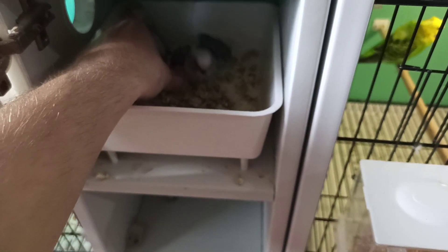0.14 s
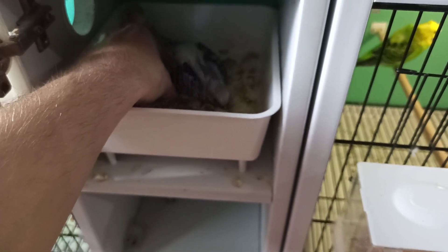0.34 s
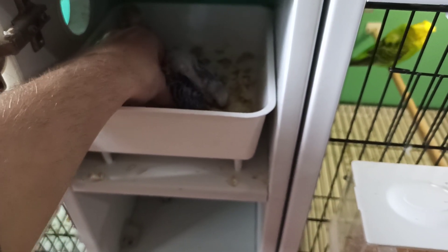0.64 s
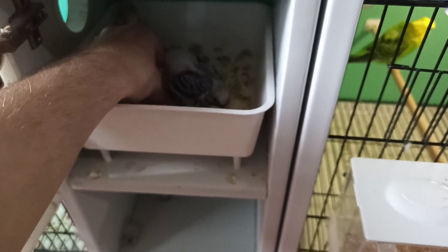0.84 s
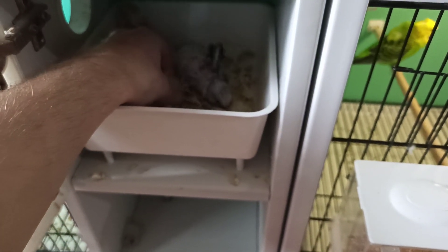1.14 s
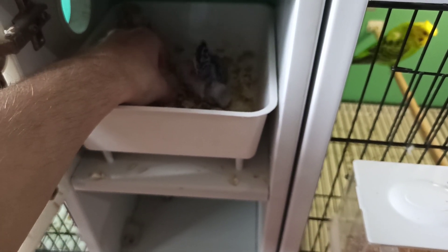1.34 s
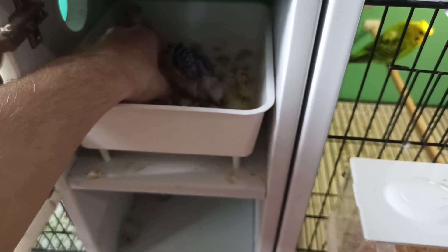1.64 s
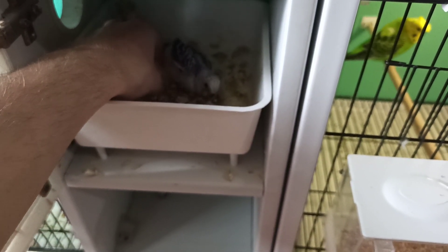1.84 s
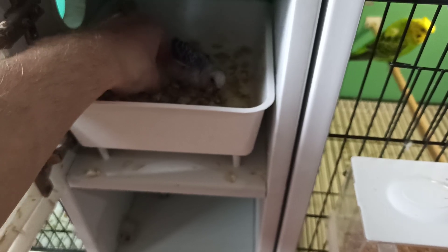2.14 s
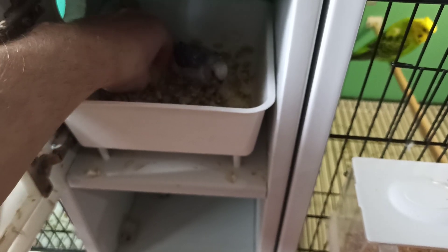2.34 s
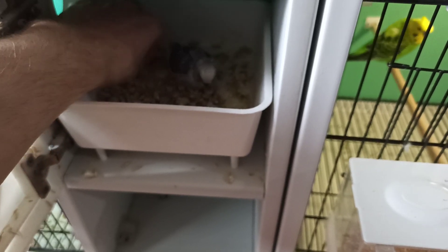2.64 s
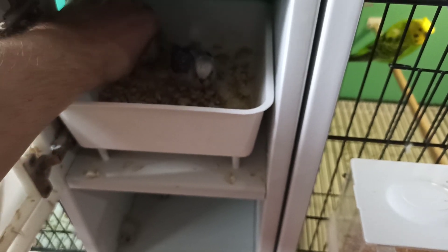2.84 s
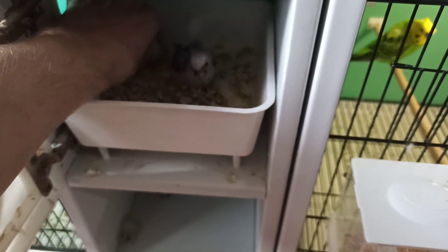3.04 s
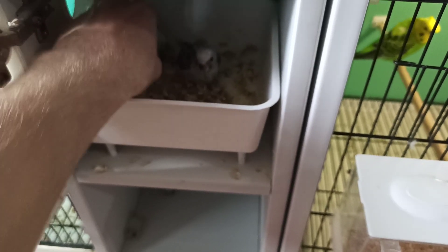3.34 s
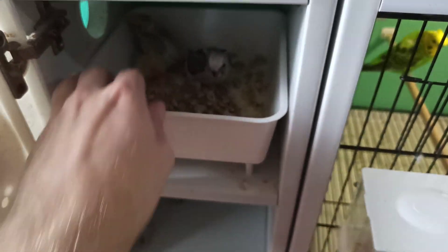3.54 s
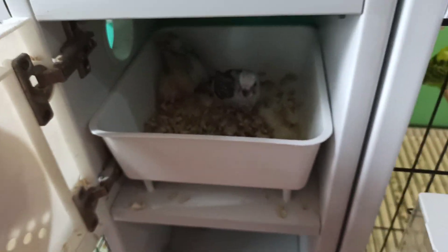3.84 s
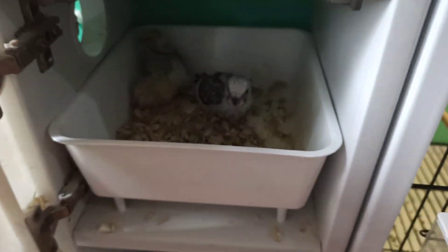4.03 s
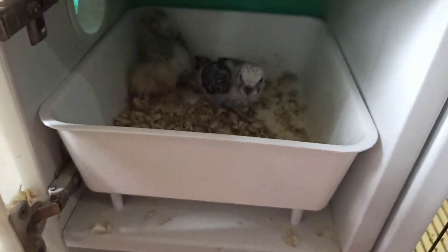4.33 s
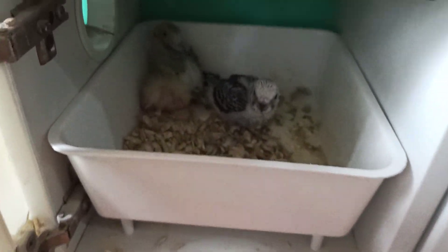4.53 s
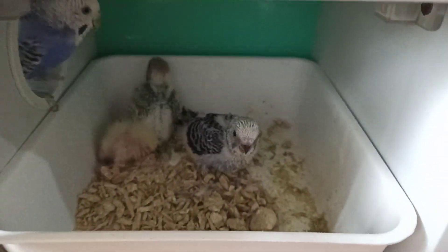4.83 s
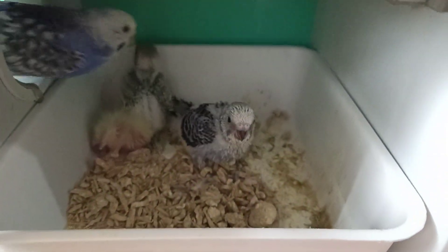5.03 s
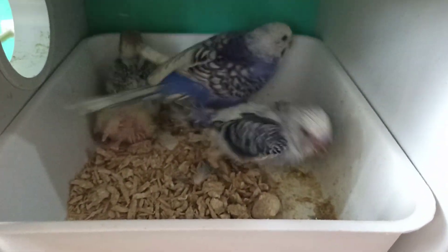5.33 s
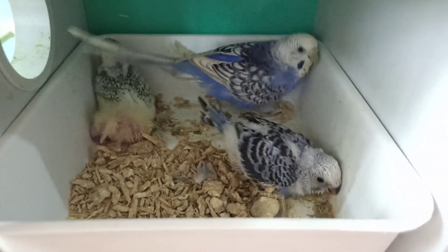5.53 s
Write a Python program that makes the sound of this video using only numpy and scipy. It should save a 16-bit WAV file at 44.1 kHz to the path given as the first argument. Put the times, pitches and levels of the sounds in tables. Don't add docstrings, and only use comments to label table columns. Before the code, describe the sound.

In a lively aviary, a chick's quick squeaky trills mix with whistles, swooping calls, harsh squawks, bedding rustle and knocks on a plastic tray.

```python
import sys
import numpy as np
from scipy import signal
from scipy.fft import rfft, irfft, next_fast_len
from scipy.io import wavfile
from scipy.ndimage import uniform_filter1d

SR = 44100
rng = np.random.default_rng(int(sys.argv[2]) if len(sys.argv) > 2 else 0)


def how_loud(loudness_db):
    steps = np.asarray(loudness_db, float) / 20
    return 10 ** steps


def generate_wav(sig):
    pcm = np.round(np.clip(np.atleast_2d(sig).T, -1, 1) * 32767).astype(np.int16)
    wavfile.write(sys.argv[1], SR, pcm)


N = 250440

# top time in seconds,
# dip before it in Hz, ledge in Hz, top in Hz, level in dB.
TRILL_NOTES = [
    [(0.004, 3500, 3640, 4625, -36.5), (0.062, 3200, 3537, 4650, -35.5)],
    [(0.312, 3160, 3574, 4420, -41.5), (0.371, 3160, 3600, 4620, -40), (0.43, 3316, 3630, 4080, -38.5)],
    [(.588, 3350, 3600, 4340, -43), (.646, 3400, 3720, 4750, -39.5), (.704, 3300, 3590, 4420, -47),
     (0.763, 3250, 3480, 4100, -35.5)],
    [(1.705, 3330, 3620, 4780, -37.5), (1.765, 3260, 3640, 4620, -35.5), (1.816, 3195, 3470, 4000, -41)],
    [(2.038, 3142, 3475, 4620, -36.5), (2.096, 3270, 3620, 4630, -34), (2.157, 3260, 3620, 4054, -36.5)],
    [(2.982, 2450, 3670, 4670, -45.5), (3.035, 3150, 3720, 4780, -42)],
    [(3.26, 3300, 3697, 4680, -38.5), (3.318, 3373, 3670, 4600, -38), (3.375, 3435, 3680, 4420, -37.5)],
    [(3.764, 3200, 3666, 4510, -38), (3.818, 3214, 3600, 4250, -36.5)],
    [(4.178, 3520, 3500, 4700, -41), (4.235, 3150, 3760, 4480, -41)],
    [(4.9, 3400, 3500, 4440, -36.5), (4.957, 3050, 3406, 4050, -38.5), (5.017, 3150, 3350, 3950, -36.5),
     (5.077, 2876, 3300, 3850, -38.5)],
]
# start in seconds from the scene start,
# last dip in Hz, last dip in dB, 2nd partial in dB.
TRILL_ENDINGS = [(-.052, 3250, -7, -1.5), (.262, 3300, -6, -2.5), (.548, 3430, -5, -13),
                 (1.655, 2930, -18, -1), (1.983, 3125, 1.5, -4), (2.923, 3600, -24, -1),
                 (3.209, 3174, 9.5, -5), (3.726, 3150, -4, -9.5), (4.134, 3280, -5, -12.5),
                 (4.868, 3080, -16, -13)]
# 3rd partial in dB, left over right in dB, room send in dB.
TRILL_TONE = (-30, -4.3, -8)
LEAD_S = 0.008
DROP_S, FLICK_S, PERCH_S, TAIL_S = 0.013, 0.0035, 0.0035, 0.0089
REST_SHARE, LEDGE_SHARE = 0.34, 0.6
HIGH_TOP_HZ = 4300
LEAP_DB, TOP_DB, DIP_DB = 1, 0, -0.5
# frequency in Hz, gain in dB.
PARTIAL_GAIN = [(4750, -0.5), (5150, -12), (5900, -1), (6300, -0.5), (7500, 3.5), (7950, -12),
                (15700, -18.5), (16300, -90)]

# top time in seconds, low pitch in Hz, top pitch in Hz, level in dB.
PEEP_NOTES = [
    (2.917, 2600, 3300, -50),
    (2.992, 2550, 3300, -51),
    (4.141, 2600, 3600, -44),
    (4.206, 2400, 3520, -39.5),
    (4.282, 2350, 3550, -45),
    (4.358, 2430, 3600, -50.5),
    (4.876, 2600, 3650, -49),
    (4.941, 2450, 3600, -50),
    (5.011, 2400, 3700, -46),
    (5.08, 2300, 3700, -49.5),
]
# seconds from the top, share of the height, level in dB.
PEEP_CURVE = [(-.028, -.05, -3), (-.011, .08, 2), (-.007, 0.57, -1), (-.003, 1, 6), (.005, 0.85, -2.5),
              (.009, .55, -9), (.013, .05, 4), (0.021, 0, -8)]

# start in seconds, length in seconds,
# start in Hz, end in Hz, level in dB.
HELD_WHISTLES = [
    (0.836, 0.18, 3116, 3050, -20.5),
    (1.241, 0.23, 3093, 3097, -21),
    (3.533, 0.14, 3440, 3275, -33),
    (0.518, 0.053, 3386, 3326, -38),
    (0.55, 0.079, 1920, 1850, -44.5),
    (2.286, 0.12, 1620, 1762, -49),
    (3.313, 0.12, 2080, 1880, -42),
    (3.536, 0.19, 6660, 6820, -44),
]
PIPED_NOTES = [
    (0.771, 0.043, 2697, 2673, -22.5),
    (1.17, 0.091, 2700, 2765, -23.5),
]
HELD_OVERTONES = [-34, -17, -18]
PIPED_OVERTONES = [-12.5, -3.5, 4, -7.5]

# time in seconds, pitch in Hz, level in dB.
SWOOP_CURVES = [
    [(.985, 1653, -46), (1.04, 1790, -38.5), (1.075, 1920, -33), (1.095, 2130, -29.5), (1.12, 2480, -25.5),
     (1.14, 2620, -28.5), (1.17, 2353, -32.5), (1.205, 2225, -28.5), (1.23, 1920, -35)],
    [(3.532, 1620, -44), (3.61, 1682, -40), (3.635, 1875, -28), (3.655, 2097, -22.5), (3.68, 2394, -28.5),
     (3.705, 2394, -24.5), (3.73, 2237, -21), (3.8, 2177, -22.5), (3.83, 1924, -35), (3.88, 1980, -42.5)],
]
# 2nd to 7th partial in dB, then room send in dB.
SWOOP_TONE = (-14, -22, -38, -30, -29, -20, -1.5)
SWOOP_WAVER = (0.028, 0.022)

# time in seconds, pitch in Hz, level in dB.
BEND_CURVES = [
    [(.59, 2840, -28.5), (.605, 2760, -36.5), (.63, 2464, -27.5), (.665, 2507, -41.5), (.7, 2333, -47.5),
     (.745, 2466, -47)],
    [(.565, 3625, -35.5), (.59, 3890, -39.5), (.625, 3770, -41), (.66, 3650, -59.5)],
    [(.99, 3415, -19.5), (1.01, 3536, -20), (1.045, 3270, -26.5), (1.058, 3553, -19.5), (1.1, 3530, -34),
     (1.16, 3590, -44)],
    [(1.16, 2660, -27.5), (1.205, 2770, -36), (1.225, 2600, -17.5), (1.25, 2994, -31.5)],
    [(2.34, 3900, -43), (2.365, 3790, -43.5), (2.39, 3620, -41.5), (2.425, 3463, -27.5), (2.45, 3304, -38),
     (2.49, 3290, -46)],
    [(2.405, 3000, -40), (2.43, 2770, -27), (2.46, 2733, -27), (2.5, 2710, -48)],
]
BEND_WAVER = (.05, 0.055, 0.032, 0.075, 0.037, 0.023)
BEND_SECOND_DB = (-15, -12, -18, -21.5, -24, -20)
# 3rd, 4th and 5th partial in dB, then room send in dB.
BEND_TONE = (-12.5, -10.5, -12, -1)

# start in seconds, start in Hz, end in Hz, level in dB.
CHIP_NOTES = [(0.113, 3620, 3440, -38), (0.137, 7270, 6350, -44), (0.171, 6900, 2940, -53),
              (0.524, 8300, 4140, -48), (1.787, 2050, 2160, -46), (2.035, 1580, 1500, -46.5),
              (0.782, 3280, 3340, -35), (0.977, 6530, 4400, -34.5), (2.245, 6800, 4380, -50),
              (3.155, 4960, 3530, -50), (4.115, 2650, 2800, -51), (4.251, 1600, 1700, -44.5),
              (3.527, 5000, 3510, -35.5), (3.934, 6770, 4800, -29), (3.948, 5212, 6630, -33),
              (3.977, 6700, 3100, -42), (4.093, 2250, 2370, -40.5), (0.525, 6650, 6580, -34.5),
              (0.799, 4700, 3390, -35), (4.418, 6350, 6500, -30), (4.822, 6900, 4560, -28.5),
              (4.838, 4600, 2950, -41), (5.208, 6390, 6500, -28), (5.24, 7231, 3700, -44),
              (5.586, 3340, 3960, -36.5), (5.611, 2900, 2970, -36.5), (5.62, 6890, 6390, -29),
              (5.631, 6677, 3670, -38), (5.638, 8570, 7000, -59), (5.653, 3770, 3280, -39)]
CHIP_S, CHIP_S_PER_OCTAVE = 0.013, 0.006
# start pitch in Hz, left over right in dB.
CHIP_SIDE = [(2500, -3), (7000, 9.5)]

# start in seconds, length in seconds, level in dB.
COO_NOTES = [
    (2.2, 0.0514, -50),
    (2.3, 0.2, -62.5),
    (2.35, 0.0454, -49),
    (2.51, 0.07, -55),
    (4.14, 0.034, -50.5),
    (4.2, 0.063, -54),
    (4.33, .12, -59.5),
    (4.5, 0.06, -56.5),
    (4.59, 0.10376, -58.5),
]
COO_HZ = 497.2

# start in seconds, rise in seconds, time to fall 60 dB in seconds,
# effort in dB, share of low sound in dB.
FAR_BIRD = [
    (.518, 0.029, 0.17, -41, -3.5),
    (0.58, 0.068, 0.36, -38.5, -2.5),
    (.775, 0.055, 0.22, -31.5, 6.5),
    (.965, 0.056, 0.4, -32.5, 5),
    (1.19, 0.045, 0.37, -30.5, 4.5),
    (1.376, 0.037, 0.11, -45, 6.5),
]
NEAR_BIRD = [
    (2.499, 0.045, 0.21, -21, -4),
    (2.645, 0.019, 0.24, -19, -9.5),
    (4.42, 0.046, 0.235, -20, -8),
    (4.53, 0.06, 0.21, -18, -11),
    (4.718, 0.025, 0.041, -21.5, -7.5),
    (5.274, 0.032, 0.1, -19.5, -6),
    (5.362, 0.067, 0.17, -20.5, -7),
    (5.491, 0.017, 0.18, -36, -15),
]
FAR_PAN_DB, NEAR_PAN_DB = -8, -8.5
FAR_START, NEAR_START = 0.05, 0.17
# frequency in Hz, width in Hz, level in dB.
BEAK_RINGS = [(3620, 60, 9), (4565, 56, 12.5), (5600, 19, -31.5), (6500, 160, 17), (7050, 60, -2),
              (7482, 14, 20)]
BEAK_WANDER, BEAK_WANDER_S = 0.012, 0.0089
# frequency in Hz, level in dB per Hz.
RASP_TONE = [(530, -100.5), (900, -27), (1030, -35.5), (2080, -14), (3600, 0.5), (5040, -13.5),
             (6560, -2.5), (7840, -16), (8630, -25), (8950, -45), (9500, -64), (11100, -57.5), (11500, -13),
             (12100, -26.5), (15700, -30)]

# time in seconds, peak in dB, pitch in Hz, time to fall 60 dB in seconds.
BOX_KNOCKS = [(0.2, -31, 352, 0.073), (0.657, -26, 292, 0.094), (1.27, -36.5, 302, 0.11),
              (1.699, -49, 300, 0.11), (1.762, -48, 297, 0.084), (2.643, -37, 566, 0.057),
              (3.104, -35, 274, 0.045), (3.256, -37, 275.8, 0.17), (3.483, -33.5, 284, 0.066),
              (3.553, -39.5, 147, 0.1), (3.644, -30.5, 700, 0.031), (4.137, -34.5, 356, 0.051),
              (4.27, -43.5, 268, 0.34), (4.791, -43.5, 235.1, 0.25), (4.874, -27.5, 330, 0.023),
              (5.135, -36.5, 317, 0.083), (5.183, -42.5, 1320, 0.13), (5.211, -13.5, 300, 0.038),
              (5.231, -17, 291, 0.047), (5.25, -18, 235, 0.038), (5.275, -26.5, 244, 0.12),
              (5.294, -18.5, 1187, 0.025), (5.376, -33, 313, 0.14), (5.444, -11, 328.6, 0.021),
              (5.561, -21, 1150, 0.022)]
# time in seconds, peak in dB, left over right in dB.
SHAVING_SNAPS = [(0.2013, -59.5, 11), (2.0666, -35.5, -10.5), (2.254, -50, -8.5), (2.393, -37, 2),
                 (2.8538, -33, -7.5), (3.0937, -45, -1.5), (3.4868, -39.5, 7), (3.53, -42, -1),
                 (3.93, -38.5, -5.5), (4.1745, -32.5, -2), (4.226, -33.5, -13.5), (4.274, -32.5, -3),
                 (4.8745, -35, -1), (4.921, -62, -4), (5.1362, -41, 18.5), (5.153, -31.5, 7.5),
                 (5.195, -36, -1.5), (5.213, -36, 16)]
# start in seconds, length in seconds, level in dB, centre in Hz.
SHAVING_RUSTLES = [
    (0.032, 0.15, -40, 2530),
    (0.333, 0.043, -54.5, 2230),
    (1.981, 0.14, -50.5, 1620),
    (2.142, 0.11, -45, 1420),
    (2.555, 0.035, -47, 1230),
    (3.356, 0.1, -35, 2438),
    (3.4, 0.12, -45, 910),
    (4.95, 0.086, -66, 2505),
    (5.191, 0.087, -35.5, 960),
]

# time in seconds, chatter in dB.
FLOCK_STIR = [(0, -42.5), (0.219, -53.5), (.45, -53), (.7, -45.5), (1.3, -48.5), (1.6, -49.5), (1.92, -56),
              (2.2, -48), (2.7, -45.5), (2.951, -51.5), (3.15, -54.5), (3.699, -47.5), (4.049, -57.5),
              (4.349, -53), (4.85, -47), (5.099, -57), (5.3, -38), (5.68, -45)]
# frequency in Hz, level in dB per Hz.
CHATTER_TONE = [(710, -54.5), (1200, -3.5), (1320, -6), (1620, 0), (1950, -5.5), (2340, 3), (4230, 2),
                (4710, -3), (5900, -9), (6570, 4.5), (8140, 1), (8500, -14.5), (9000, -55.5),
                (11300, -56.5), (11700, -14), (15700, -13)]
# frequency in Hz, level in dB per Hz.
RUMBLE_TONE = [(18, -41.5), (30, -37), (43, -53.5), (92, 1), (200, -2.5), (295, 1), (697, -9), (923, -6.5),
               (1290, -16.5), (1510, -26.5), (2000, -11), (2600, -53), (4400, -120)]
RUMBLE_DB, RUMBLE_SHARE, CALM_DB = -51, 0.44, -47
RUMBLE_RISE_DB = 0.8644
# frequency in Hz, level in dB.
FAN_TONES = [(99, -61.5), (302, -63)]

# frequency in Hz, likeness from -1 to 1.
PORT_LIKENESS = [(60, 0.03), (180, 0.97), (550, 0.54), (1650, -0.37), (4970, 0.067), (15000, -0.092)]
# frequency in Hz, left over right in dB.
PORT_LEAN = [(60, 1.5), (180, 0.5), (550, 2), (1650, -0.57), (4970, -2), (15000, -2)]
# frequency in Hz, time to fall 60 dB in seconds.
ROOM_DECAY = [(1500, 0.31), (3960, 0.33), (10400, 0.18)]
# first in seconds, last in seconds, level in dB.
TRAY_ECHOES = (.0006, .005, -11.5)
LEFT_LEAD = 10
DROPPED_BAND = (8620, 11620)


def trill(stage, notes, ending):
    start, last_hz, last_db, second_db = ending
    rows = [(start - LEAD_S, 1.1 * notes[0][1], notes[0][4] - 6)]
    for s, dip, ledge, top, db in notes:
        flick = FLICK_S * (1 if top > HIGH_TOP_HZ else 2)
        middle = (ledge + top) / 2
        leap_level_db = db + LEAP_DB * (top - ledge) / 1000
        leap = s - PERCH_S - flick
        climb = leap - start
        land = s + PERCH_S + flick
        rows += [(start, dip, db + DIP_DB), (start + REST_SHARE * climb, dip, db + DIP_DB)]
        rows += [(start + LEDGE_SHARE * climb, ledge, db), (leap, ledge, db)]
        rows += [(leap + flick / 2, middle, leap_level_db)]
        rows += [(s - PERCH_S, top, db + TOP_DB), (s + PERCH_S, top, db + TOP_DB)]
        rows += [(s + PERCH_S + flick / 2, middle, leap_level_db), (land, ledge, db)]
        start = land + DROP_S / 2
    end = start + DROP_S / 2
    rows += [(end, last_hz, db + last_db), (end + TAIL_S, 0.97 * last_hz, db + last_db - 6.5)]
    begin = rows[0][0]
    cut = max(round(-begin * SR), 0)
    hz, db = (curve[cut:] for curve in spread(rows))
    third_db, pan_db, room_db = TRILL_TONE
    voice = syrinx(uniform_filter1d(hz, 50), db, [second_db, third_db], 0.009, 0.006)
    add(stage, begin, voice, pan_db, room_db)
    second = syrinx(0.64 * uniform_filter1d(hz, 300), db - 28, [], 0.027, 0.01)
    add(stage, begin + 0.013, second, pan_db, room_db)


def syrinx(hz, db, overtones_db, wobble, fade_s, flutter_db=3.0):
    turns = np.cumsum(hz * (1 + wobble * drift(len(hz), 0.002))) / SR
    tone = 0
    for number, gain_db in enumerate((0, *overtones_db), start=1):
        tone = tone + how_loud(gain_db + read(PARTIAL_GAIN, number * hz)) * np.sin(2 * np.pi * number * turns)
    fade = signal.windows.tukey(len(hz), min(2 * fade_s * SR / len(hz), 1))
    return np.sqrt(2) * tone * how_loud(db + flutter_db * drift(len(hz), 0.004)) * fade


def peeps(stage):
    for s, low_hz, top_hz, db in PEEP_NOTES:
        height, shape_db = spread(PEEP_CURVE)
        hz = low_hz + height * (top_hz - low_hz)
        add(stage, s + PEEP_CURVE[0][0], syrinx(hz, db + 2.5 + shape_db, [-20], 0.0057, 0.003), -3, -16)


def whistle(stage, row, overtones_db, wobble, room_db, swell=0.015, hold_share=0.46, fade_db=170):
    s, length, start_hz, end_hz, db = row
    t = np.arange(0, length, 1 / SR)
    swell_db = 8 * np.maximum(1 - t / swell, 0)
    tired_db = fade_db * np.maximum(t - hold_share * length, 0)
    hz = np.geomspace(start_hz, end_hz, len(t))
    add(stage, s, syrinx(hz, db - swell_db - tired_db, overtones_db, wobble, 0.0036), -3.5, room_db)


def whistles(stage):
    for row in HELD_WHISTLES:
        whistle(stage, row, HELD_OVERTONES, 0.004, -7)
    for row in PIPED_NOTES:
        whistle(stage, row, PIPED_OVERTONES, 0.012, -6)


def swoops(stage):
    *overtones_db, room_db = SWOOP_TONE
    for rows, wobble in zip(SWOOP_CURVES, SWOOP_WAVER):
        voice = syrinx(*spread(rows), overtones_db, wobble, 0.00073, flutter_db=4.0)
        add(stage, rows[0][0], voice, -3.5, room_db)


def bends(stage):
    *overtones_db, room_db = BEND_TONE
    for rows, wobble, second_db in zip(BEND_CURVES, BEND_WAVER, BEND_SECOND_DB):
        voice = syrinx(*spread(rows), [second_db, *overtones_db], wobble, 0.0026, flutter_db=3.5)
        add(stage, rows[0][0], voice, -3.5, room_db)


def chips(stage):
    for s, start_hz, end_hz, db in CHIP_NOTES:
        octaves = abs(np.log2(end_hz / start_hz))
        hz = np.geomspace(start_hz, end_hz, round((CHIP_S + CHIP_S_PER_OCTAVE * octaves) * SR))
        add(stage, s, syrinx(hz, db, [-25], 0.006, 0.003), read(CHIP_SIDE, start_hz), -12)


def squawk(stage, row, pan_db, first, pulses_hz=380, uneven=0.35, gate=0.19, ring_db=-5, room_db=2.5):
    s, rise, t60, db, low_db = row
    t = np.arange(-rise, t60, 1 / SR)
    size = len(t)
    turns = np.cumsum(pulses_hz * np.exp(uneven * drift(size, 0.00402))) / SR
    puffs = (gate + np.sin(np.pi * turns) ** 2) * how_loud(1.46 * drift(size, 0.0032)) * white(size)
    rasp = colour(puffs, lambda hz: read(RASP_TONE, hz))
    rings = 0
    for hz, width, gain_db in BEAK_RINGS:
        moving_hz = hz * (1 + BEAK_WANDER * drift(size, BEAK_WANDER_S))
        rings = rings + how_loud(gain_db) * evened(resonate(puffs, moving_hz, 3 * width))
    voice = evened(rasp) + how_loud(ring_db) * evened(rings)
    low = colour(voice, lambda hz: np.interp(hz, [4700, 5100], [0, -80]))
    rising = first + (1 - first) * np.cos(np.pi / 2 * t / rise) ** 2
    effort = np.where(t < 0, rising, how_loud(-60 * t / t60))
    add(stage, s, how_loud(db) * effort * (evened(voice - low) + how_loud(low_db) * evened(low)), pan_db, room_db)


def coos(stage):
    for s, length, db in COO_NOTES:
        hz = np.full(round(length * SR), COO_HZ)
        add(stage, s, syrinx(hz, db + 8.5, [-25], 0.0019, 0.014), 1.5, -12)


def knocks():
    out, t = np.zeros((3, N)), np.arange(6000) / SR
    for s, db, hz, t60 in BOX_KNOCKS:
        thud = np.sin(2 * np.pi * hz * t)
        thud += 0.32 * np.sin(2 * np.pi * 2.07 * hz * t) * how_loud(-60 * t / 0.2)
        thud *= how_loud(-60 * t / max(t60, 0.01))
        crackle = resonate(rng.standard_normal(len(t)), 1300, 2100) * how_loud(-13 - 60 * t / 0.053)
        attack = 1 - np.exp(-t / 0.00069)
        add(out, s, how_loud(db) * (thud + crackle) * attack, 2, -20)
    return out[:2]


def snaps(stage):
    t = np.arange(1300) / SR
    for s, db, pan_db in SHAVING_SNAPS:
        burst = colour(rng.standard_normal(len(t)), lambda hz: read(CHATTER_TONE, hz) / 2)
        attack = 1 - np.exp(-t / 0.00035)
        add(stage, s, how_loud(db - 2.0 - 60 * t / 0.051) * evened(burst) * attack, pan_db, -8)


def rustles(stage, grains_per_s=700):
    for s, length, db, hz in SHAVING_RUSTLES:
        size = round(length * SR)
        hits = rng.random(SR)[:size] < grains_per_s / SR
        grains = hits * how_loud(14.6 * white(size)) * np.sign(white(size))
        ringing = resonate(resonate(grains, hz, 420), hz, 420)
        add(stage, s, how_loud(db) * evened(ringing) * np.hanning(size), -1, -6)


def wash(spectrum, mean_db, share, size, patchy_db, flicker_db):
    hop = size // 4
    frames, hz = N // hop + 5, np.fft.rfftfreq(size, 1 / SR)
    a, b, c, d, patches = rng.standard_normal((frames, len(hz), 5)).T
    patches = evened(uniform_filter1d(uniform_filter1d(patches, 5, 0), 6, 1))
    same = np.clip(read(PORT_LIKENESS, hz), -1, 1)[:, None]
    left = a + 1j * b
    right = same * left + np.sqrt(1 - same ** 2) * (c + 1j * d)
    z = np.array([left, right])
    flicker = flicker_db * rng.standard_normal(frames)
    z *= how_loud(read(spectrum, hz)[:, None] + patchy_db * patches + flicker)
    z *= how_loud(np.array([0.5, -0.5])[:, None, None] * read(PORT_LEAN, hz)[:, None])
    stir_db = np.interp(np.arange(N) / SR, *np.transpose(FLOCK_STIR))
    level = how_loud(mean_db + share * (stir_db - CALM_DB))
    return level * evened(signal.istft(z, nperseg=size, noverlap=size - hop)[1][:, :N])


def flock_and_rumble(t):
    chatter = how_loud(4.0) * wash(CHATTER_TONE, CALM_DB, 0.9, size=256, patchy_db=5.5, flicker_db=0.0)
    rumble = wash(RUMBLE_TONE, RUMBLE_DB, RUMBLE_SHARE, size=1024, patchy_db=2.0, flicker_db=2.0)
    return chatter + how_loud(RUMBLE_RISE_DB * t) * rumble


def fan_hum(t):
    hum = 0
    for hz, db in FAN_TONES:
        hum = hum + np.sqrt(2) * how_loud(db + 1.5 * drift(N, 0.05)) * np.sin(2 * np.pi * hz * t)
    return hum


def tray(x, wait):
    first, last, db = TRAY_ECHOES
    taps = np.zeros(round(0.02 * SR))
    delay, sign = rng.random((2, 7))
    at = np.round(SR * (first + (last - first) * delay)).astype(int)
    taps[at] = how_loud(db - 1.4 * delay) * np.sign(sign - 0.5)
    taps[wait] = 1
    return signal.oaconvolve(x, taps / np.linalg.norm(taps))[:N]


def room(x):
    taps = np.zeros((2, SR))
    at = np.arange(200, SR - 20, 20) + rng.integers(0, 20, (2, (SR - 201) // 20))
    np.put_along_axis(taps, at, rng.choice([-1., 1.], at.shape), 1)
    hz, t, z = signal.stft(taps, SR, nperseg=256)
    tail = signal.istft(z * how_loud(-60 * t / read(ROOM_DECAY, hz)[:, None]), SR, nperseg=256)[1]
    return signal.fftconvolve(x[None], tail / np.linalg.norm(tail[0]), axes=1)[:, :N]


def add(stage, s, sound, pan_db, room_db):
    part = stage[:, max(round(s * SR), 0):][:, :len(sound)]
    part += how_loud(np.array([[pan_db / 2], [-pan_db / 2], [room_db]])) * sound[:part.shape[1]]


def spread(rows):
    s, *columns = np.transpose(rows)
    t = np.arange(s[0], s[-1], 1 / SR)
    return [np.interp(t, s, column) for column in columns]


def read(points, hz):
    f, value = np.transpose(points)
    return np.interp(np.log(hz + 1), np.log(f + 1), value)


def evened(x):
    return x / np.sqrt(np.mean(x ** 2) + 1e-20)


def white(size):
    return rng.standard_normal(max(size, SR // 2))[:size]


def drift(size, smooth_s):
    width = max(round(smooth_s * SR), 1)
    return evened(uniform_filter1d(uniform_filter1d(white(size), width), width))


def colour(x, gain_db):
    size = next_fast_len(len(x) + 512)
    return irfft(rfft(x, size) * how_loud(gain_db(np.fft.rfftfreq(size, 1 / SR))), size)[:len(x)]


def resonate(x, hz, width):
    turn = np.exp(2j * np.pi * np.cumsum(hz * np.ones(len(x))) / SR)
    r = np.exp(-np.pi * width / SR)
    return 2 * (turn * signal.lfilter([1 - r], [1, -r], x / turn)).real


def scene():
    stage, t = np.zeros((3, N)), np.arange(N) / SR
    for notes, ending in zip(TRILL_NOTES, TRILL_ENDINGS):
        trill(stage, notes, ending)
    peeps(stage)
    whistles(stage)
    swoops(stage)
    bends(stage)
    chips(stage)
    for row in FAR_BIRD:
        squawk(stage, row, FAR_PAN_DB, FAR_START)
    for row in NEAR_BIRD:
        squawk(stage, row, NEAR_PAN_DB, NEAR_START)
    coos(stage)
    snaps(stage)
    rustles(stage)
    left, right, send = stage
    near = np.array([tray(left, wait=0), tray(right, wait=LEFT_LEAD)])
    echoes = room(send) * how_loud(np.array([[-1.5], [1.5]]))
    return near + echoes + knocks() + fan_hum(t) + flock_and_rumble(t)


def roll_off(x):
    return signal.sosfilt(signal.butter(12, 15850, fs=SR, output="sos"), x)


def record(dry):
    dry = 0.9 * np.tanh(dry / 0.9)
    band_stop = signal.firwin(601, DROPPED_BAND, window=("kaiser", 6), fs=SR)
    x = signal.oaconvolve(dry, band_stop[None], "same")
    x = x + how_loud(-30.0) * dry
    x = signal.sosfilt(signal.butter(3, 65, "high", fs=SR, output="sos"), x)
    top_cut = signal.firwin(401, 15800, window=("kaiser", 8), fs=SR)
    x = signal.oaconvolve(x, top_cut[None], "same")
    return roll_off(x)


dry = scene()
out = record(dry)
generate_wav(out)
```